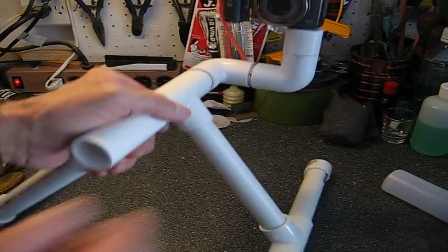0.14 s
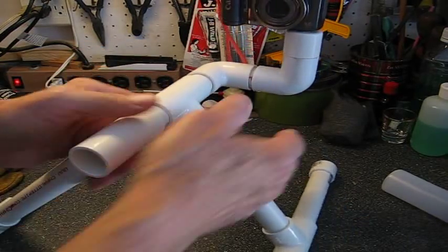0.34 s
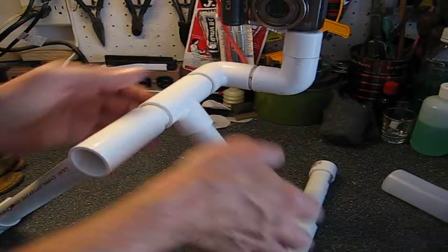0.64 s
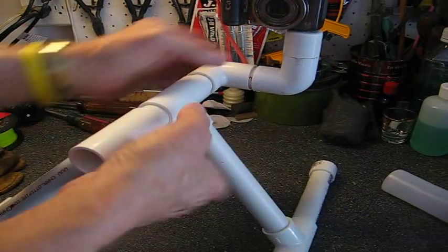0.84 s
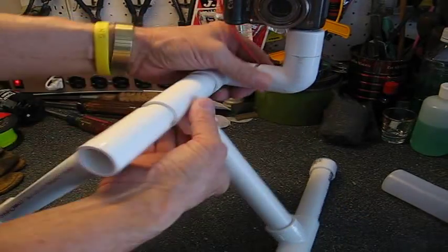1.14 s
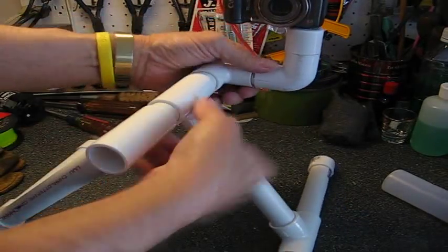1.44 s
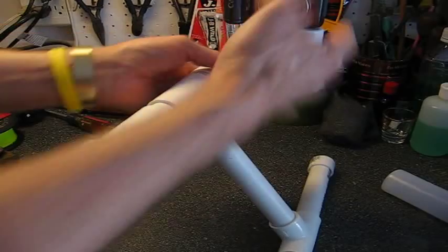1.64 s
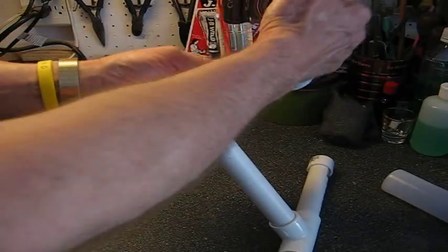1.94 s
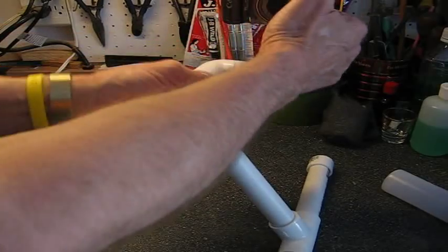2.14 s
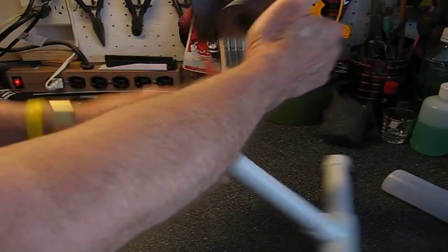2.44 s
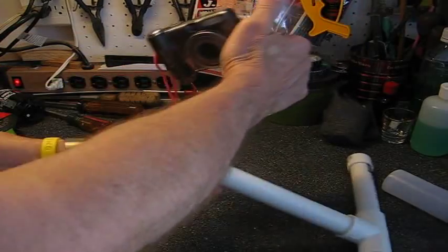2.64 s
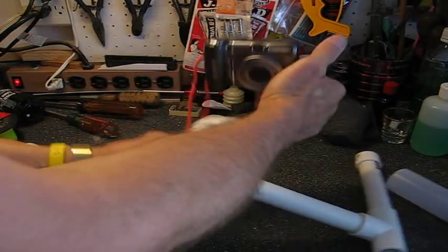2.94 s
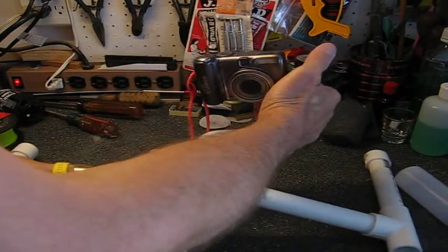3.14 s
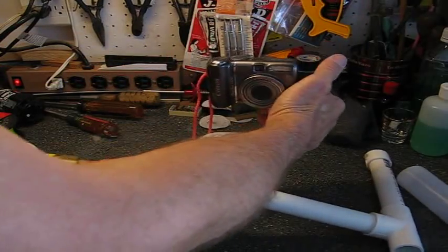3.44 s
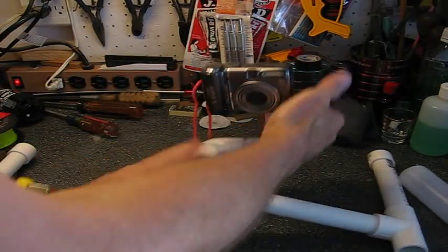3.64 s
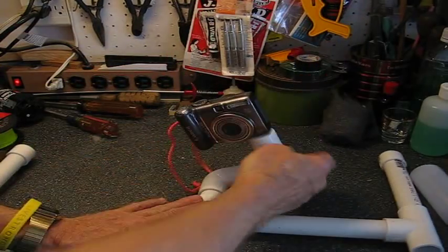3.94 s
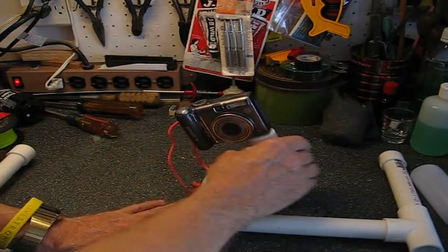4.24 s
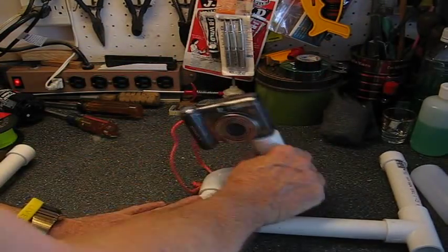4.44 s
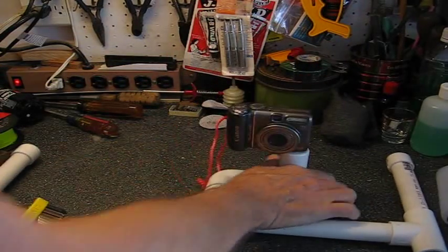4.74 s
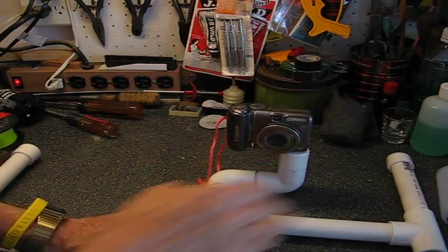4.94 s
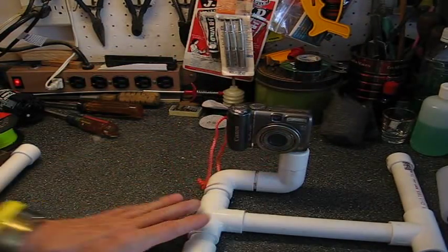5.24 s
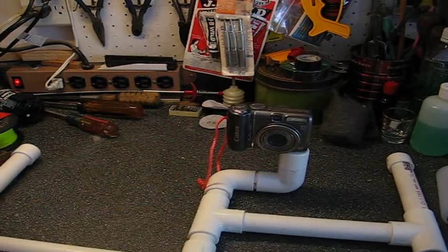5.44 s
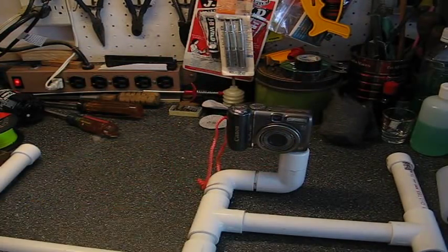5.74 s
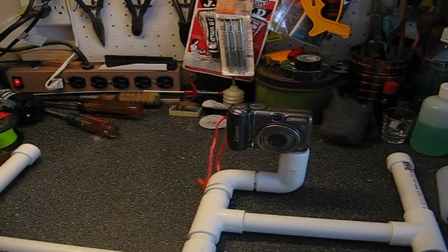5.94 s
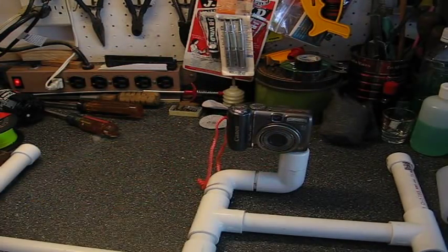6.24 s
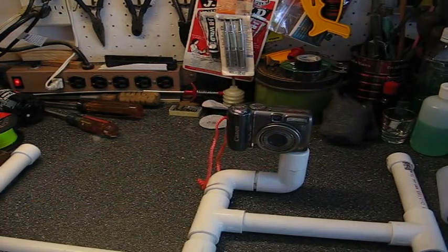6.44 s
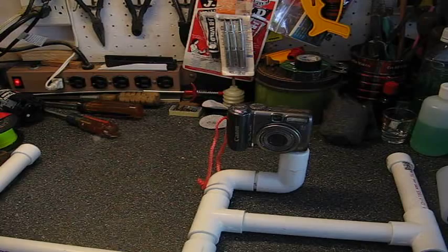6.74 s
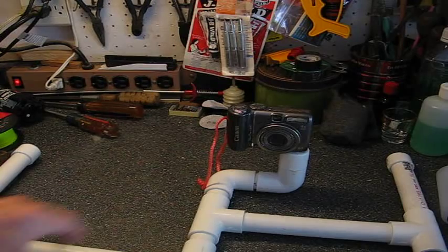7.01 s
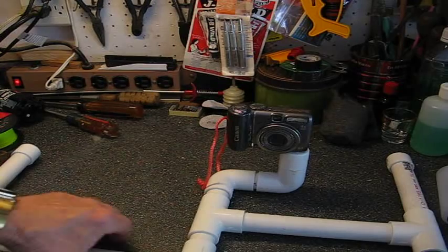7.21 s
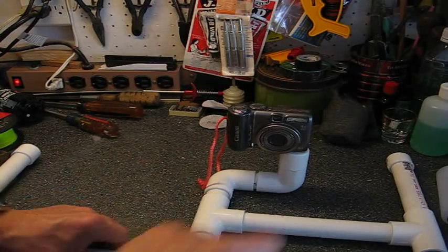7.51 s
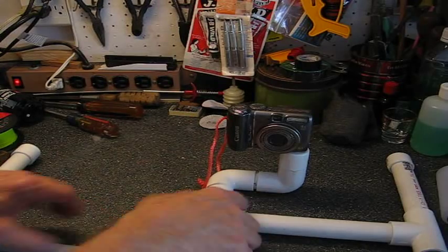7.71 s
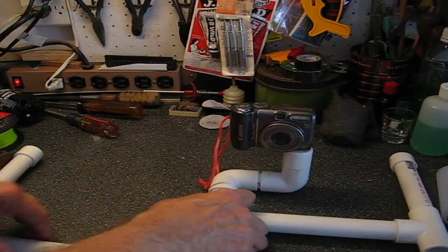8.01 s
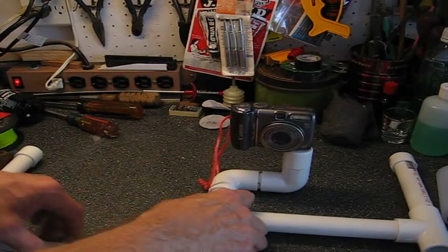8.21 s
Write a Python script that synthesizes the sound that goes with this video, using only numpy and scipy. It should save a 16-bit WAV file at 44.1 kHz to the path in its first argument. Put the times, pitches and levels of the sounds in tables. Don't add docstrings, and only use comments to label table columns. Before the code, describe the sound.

Close, rough small-camera sound of plastic pipes handled on a workbench: bangle ticks, dull hollow knocks, loose joint rattles and short gritty scrapes. The loudest blows are brittle and slightly distorted, with a short room echo. After two heavy drops midway it grows sparse, with a little cluster of clacks, faint hand rubbing and a closing knock over a low, unsteady machine hum.

```python
import sys
import numpy as np
from scipy import signal
from scipy.fft import rfft, irfft
from scipy.io import wavfile

SR = 44100
rng = np.random.default_rng(int(sys.argv[2]) if len(sys.argv) > 2 else 0)


def convert_level_to_amplitude(level_db):
    exponent = np.asarray(level_db, float) / 20
    return 10 ** exponent


def transcribe(u):
    v = np.clip(np.atleast_2d(u).T, -1, 1)
    q = np.round(v * 32767).astype(np.int16)
    wavfile.write(sys.argv[1], SR, q)


N = 369116


def rms_one(x):
    return x / np.sqrt(np.mean(x ** 2) + 1e-20)


def resonance(x, hz, width):
    r = np.exp(-np.pi * width / SR)
    top = np.array([1, 0, -1]) * (1 - r * r) / 2
    return signal.lfilter(top, [1, -2 * r * np.cos(2 * np.pi * hz / SR), r * r], x)


def body(x, modes):
    out = 0
    for k, (hz, width, db) in enumerate(modes):
        out = out + (-1) ** k * convert_level_to_amplitude(db) * resonance(x, hz, width)
    return out


def drift(rate):
    count = int(N * rate / SR) + 2
    return np.interp(np.arange(N) * rate / SR, np.arange(count), rng.standard_normal(2000)[:count])


def grains(per_s, spread_db):
    sizes = convert_level_to_amplitude(spread_db * np.minimum(rng.exponential(1, N), 4)) * rng.choice([-1, 1], N)
    return rms_one(sizes * (rng.random(N) < per_s / SR) + 1e-18)


def add(out, s, sound):
    i = round(s * SR)
    out[i:i + len(sound)] += sound[:N - i]


# (time [s], peak level [dB], pipe note [Hz], time to fade 60 dB [s], hardness [0-1])
KNOCKS = [(.162, -20, 707, 0.13, 0.1), (.197, -13.5, 349, 0.055, 0.33), (.299, -22.5, 710, 0.14, .35),
          (.3555, -5, 830, 0.034, 0.83), (1.176, -21.5, 453, 0.043, 0.6), (1.4105, -13, 352, 0.074, .5),
          (1.817, -14, 494, 0.14, 0.9), (1.944, -10.5, 473, 0.063, 0.44), (2.031, -17.5, 341, 0.086, 0.5),
          (2.322, -13.5, 463, .06, 0.37), (2.568, -2, 1300, 0.01, 0.52), (3.033, -19.5, 458, 0.14, 0.4),
          (3.0885, -7, 910, 0.028, 0.9), (3.318, -26, 680, 0.054, 0.5), (3.815, -24, 486, 0.14, 0.2),
          (3.845, -18, 516, 0.25, 0.99), (3.9345, -4, 657, 0.041, 1), (4.646, -28, 830, 0.067, 0.6),
          (4.6905, -5.5, 1010, 0.05, 0.9), (5.906, -17.5, 724, 0.093, 1), (7.808, -26, 372, 0.05, 0.26),
          (8.04, -24.5, 620, 0.051, 0.8), (8.3555, -14, 664, .031, 0.93)]
# (time [s], peak level [dB], note [Hz], time to fade 60 dB [s])
HUMS = [(0.164, -19.5, 1340, 0.035), (.2, -22.5, 692, 0.16), (.339, -5.5, 180, 0.083),
        (0.3575, -8.5, 1730, 0.041), (0.36, -27, 976, 0.15), (1.82, -14.5, 149, 0.11),
        (2.54, -16, 486, 0.65), (2.588, -3.5, 193, 0.12), (3.139, -16.5, 186, .14),
        (3.856, -13.5, 301, 0.2), (3.955, -14.5, 135, 0.12), (4.699, -5.5, 262.6, .24),
        (7.319, -34.5, 1417, 0.16), (8.349, -4.5, 213, 0.038), (8.35, -9, 139, 0.22)]
# (time [s], peak level [dB], note [Hz], time to fade 60 dB [s])
REBOUNDS = [
    (.378, -12.5, 914, 0.038),
    (3.9387, -2.5, 520, 0.077),
    (3.948, -7.5, 945, .1),
    (3.958, -8, 613, 0.097),
    (4.697, -9, 680, .068),
    (4.722, -10.5, 532, 0.14),
]
# (pitch [Hz], width [Hz], level [dB])
BENCH = [(131.3, 37, -6), (201, 45, 0.5), (276, 61, -2)]
# (pitch [Hz], width [Hz], level [dB])
PIPES = [(302, 30, -4.5), (364.4, 51, 0), (486, 50, 0.5), (680, 73, -2.5), (830, 104, 0), (913, 290, -7.5),
         (570, 30, -14)]
# (pitch [Hz], width [Hz], level [dB])
WALLS = [(1250, 130, 2.5), (1410, 150, 3), (1540, 300, -1.5), (1848, 64, -1.5), (2010, 240, -10.5)]
HUM_HARDNESS, REBOUND_HARDNESS = 0.02, 0.6
SOFT_CUT_HZ, CUT_OCTAVES = 310, 3.14
SOFT_CRACK_DB, CRACK_GAIN_DB, CRACK_T60_S = -42.5, 42.5, .035


def knocks():
    out, t = np.zeros(N), np.arange(SR // 3) / SR
    frame = BENCH + PIPES + WALLS
    blows = KNOCKS + [(*row, HUM_HARDNESS) for row in HUMS]
    blows = blows + [(*row, REBOUND_HARDNESS) for row in REBOUNDS]
    chance = rng.standard_normal((len(blows), len(frame) + 900))
    for (s, db, hz, t60, hardness), c in zip(blows, chance):
        sound = np.zeros(len(t))
        for (mode_hz, width, mode_db), u in zip(frame, c):
            level = np.sign(np.sin(9 * u)) * convert_level_to_amplitude(mode_db - 12.0 + 3.2 * u)
            sound += level * np.sin(2 * np.pi * mode_hz * t) * np.exp(-np.pi * 1.3 * width * t)
        crack_db = SOFT_CRACK_DB + CRACK_GAIN_DB * hardness + 9.5
        sound[:900] += c[-900:] * convert_level_to_amplitude(crack_db - 60 * t[:900] / CRACK_T60_S)
        cut_hz = SOFT_CUT_HZ * 2 ** (CUT_OCTAVES * hardness)
        sound = signal.sosfilt(signal.butter(4, cut_hz, fs=SR, output="sos"), sound)
        air_note = np.sin(2 * np.pi * hz * t) * convert_level_to_amplitude(1.5 - 60 * t / t60) * np.tanh(t * hz / 0.89)
        add(out, s, convert_level_to_amplitude(db) * (sound + air_note))
    return out


# (pitch [Hz], width [Hz], level [dB])
SURFACE = [(1300, 830, -3), (2730, 580, 2.5), (3690, 930, -0.5), (5700, 580, -10.5)]
# (time [s], pipes level [dB], time to die [s], bench level re pipes [dB], walls level re pipes [dB])
RATTLES = [
    (.357, -8, 0.14, -8.5, -7),
    (1.412, -17, 0.042, -0.5, -23),
    (1.816, -14, .15, -1.1, -12),
    (1.946, -24.5, 0.043, -8, -12),
    (2.321, -24.5, 0.055, -4, -24),
    (3.092, -19, 0.2, -16, -10),
    (3.938, -7, 0.29, -14, -4),
    (4.69, -9.5, 0.32, -17, -9.5),
    (8.354, -13.5, .39, -24, -13),
]
RATTLE_GRIT_DB = -14


def rattles():
    t, levels = np.arange(SR // 2) / SR, np.zeros((4, N))
    for s, db, t60, bench_db, walls_db in RATTLES:
        fade_db = 60 * (t / t60) ** 1.41
        for level, part_db in zip(levels, (0, bench_db, walls_db, RATTLE_GRIT_DB)):
            add(level, s, convert_level_to_amplitude(db + part_db - fade_db))
    shaken = grains(4500, spread_db=4.0)
    parts = PIPES, BENCH, WALLS, SURFACE
    return sum(level * rms_one(body(shaken, modes)) for level, modes in zip(levels, parts))


# (time of greatest pressure [s], rise [s], fall [s], pipes level [dB], grit level re pipes [dB])
DRAGS = [(.05, 0.2, 0.14, -32.5, -4.5), (.18, 0.089, 0.056, -32, 1), (.6, 0.23, 0.27, -47, 7),
         (1.32, 0.084, 0.1, -25.5, -7), (2.6, 0.083, .17, -15.5, -7), (2.7, .06, 0.086, -30, -0.5),
         (2.862, 0.052, 0.037, -34.5, -6), (2.96, 0.047, 0.022, -32.5, -1.5),
         (3.08, 0.11, 0.073, -26.5, -3.3), (3.16, 0.057, 0.047, -19.5, -10.5),
         (4.675, 0.13, 0.057, -32, -5.5), (7.89, 0.028, 1, -44.5, 3.5)]
# (time of greatest pressure [s], rise [s], fall [s], pipes level [dB], grit level re pipes [dB])
RUBS = [(.31, .06, 0.09, -27, -9), (2.5, 0.027, 0.17, -24, -5.5), (3.23, 0.012, 0.02, -41, 5.5),
        (3.815, 0.014, 0.021, -22, -7.5), (3.865, 0.052, 0.14, -18.5, -5), (3.98, 0.057, 0.12, -27, 0.5),
        (4.33, .04, .04, -48, -3), (4.56, 0.025, 0.067, -49, 7), (5.58, 0.07, 0.037, -35, -10),
        (5.915, 0.033, 0.069, -30.5, 6.5), (7.15, 0.44, 0.09, -50.5, 9), (7.395, 0.052, 0.099, -42, 7),
        (7.668, 0.055, 0.048, -42, 7)]
DRAG_BENCH_DB, RUB_BENCH_DB = -1.5, -26.5
FINEST_DB, FINEST_GROWTH = -13.5, 0.41
STROKE_FADE_DB, STROKE_ROUNDNESS = 26.5, 1.7


def strokes():
    t, levels = np.arange(N) / SR, np.zeros((4, N))
    for rows, bench_db in ((DRAGS, DRAG_BENCH_DB), (RUBS, RUB_BENCH_DB)):
        for s, rise, fall, db, grit_db in rows:
            near = slice(max(int((s - 2 * rise) * SR), 0), int((s + 2 * fall) * SR))
            away = np.maximum((s - t[near]) / rise, (t[near] - s) / fall)
            pressure = convert_level_to_amplitude(db - STROKE_FADE_DB * away ** STROKE_ROUNDNESS)
            finest_db = grit_db + FINEST_DB + FINEST_GROWTH * (db + 33.5)
            levels[:, near] += pressure * convert_level_to_amplitude(np.array([[0], [grit_db], [bench_db], [finest_db]]))
    return levels


def slides():
    slips = convert_level_to_amplitude(0.76 * drift(40)) * grains(1500, spread_db=2.5)
    fine = convert_level_to_amplitude(3.5 * drift(60)) * (grains(2500, spread_db=4.0) + .5 * slips)
    finest = convert_level_to_amplitude(3.5 * drift(82)) * grains(1800, spread_db=3.5)
    hollow = rms_one(body(slips, PIPES)) + convert_level_to_amplitude(-11) * rms_one(body(slips, WALLS))
    hiss = resonance(resonance(finest, 5000, 1800), 5000, 1800)
    layers = hollow, body(fine, SURFACE), body(slips, BENCH), hiss
    return sum(level * rms_one(layer) for level, layer in zip(strokes(), layers))


# (time [s], peak level [dB], centre pitch [Hz])
CLICKS = [(.017, -25, 3000), (.065, -21, 3500), (.104, -22, 3500), (.316, -17, 4800), (0.3562, -5, 3740),
          (1.4099, 0.5, 4760), (1.822, -15, 3950), (2.6, -16, 4550), (2.699, -34, 3500), (2.991, -20, 4900),
          (3.0889, -7, 1470), (3.1398, -4.5, 4300), (3.406, -12, 4530), (3.544, -17, 4500),
          (3.9345, 5.5, 3630), (3.9385, -1, 2000), (4.318, -30, 4500), (4.553, -24, 4000),
          (4.6905, -5.5, 3020), (5.9249, -9, 3480), (5.953, -15, 4530), (5.977, -18, 4800),
          (7.899, -17, 3100)]
# (time [s], peak level [dB], centre pitch [Hz])
SCUFFS = [(.175, -13.5, 3900), (.3, -16, 5330), (1.8139, -10, 3500), (2.56, -11.5, 4900), (2.655, -9, 4760),
          (2.733, -12, 4500), (2.799, -14.5, 3400), (2.949, -23, 2300), (3.109, -12, 3160),
          (3.168, -11.5, 3780), (3.231, -25, 1800), (3.239, -34, 2900), (3.765, -21, 4000),
          (3.844, -12.5, 3700), (4.71, -16, 4980), (4.835, -20.5, 4500), (5.9068, -9, 3020),
          (7.64, -40, 3000), (8.353, -12, 3080)]
CLICK_T60_S, SCUFF_T60_S = .006, 0.025
FIRST_TOUCH = 4.8


def ticks():
    out, t = np.zeros(N), np.arange(1500) / SR
    snaps = [(*row, CLICK_T60_S) for row in CLICKS] + [(*row, SCUFF_T60_S) for row in SCUFFS]
    chance = rng.standard_normal((len(snaps), len(t)))
    for (s, db, hz, t60), c in zip(snaps, chance):
        fizz = (c - FIRST_TOUCH * (t == 0)) * convert_level_to_amplitude(-60 * t / t60)
        snap = resonance(resonance(fizz, hz, 0.79 * hz), hz, 0.79 * hz)
        add(out, s, convert_level_to_amplitude(db) * snap / np.abs(snap).max())
    return out


# (centre pitch [Hz], time to fade 60 dB [s], level [dB])
ROOM = [(131, 0.41, 6.5), (360, 0.32, -1.5), (870, 0.31, -4), (2340, 0.23, -1.5), (4220, 0.1, -5)]
ROOM_DB = -10.5


def room(x):
    t, tail = np.arange(SR * 6 // 10) / SR, 0
    for hz, t60, db in ROOM:
        band = rms_one(resonance(rng.standard_normal(len(t)), hz, 0.3 * hz))
        tail = tail + band * np.sqrt(hz / 1000) * convert_level_to_amplitude(db - 60 * t / t60)
    tail = tail * np.clip(t / 0.0035, 0, 1)
    return signal.fftconvolve(x, tail / np.sqrt(np.sum(tail ** 2)))[:N]


# (pitch [Hz], level per Hz [dB])
SHOP = [(38, -9.5), (62, -7.5), (150, -17.5), (430, -25), (850, -29), (1200, -33.5), (3300, -36),
        (6500, -47)]
# (time [s], level [dB])
SHOP_LEVEL = [(0.0, -20.5), (0.67, -25), (1.21, -24), (1.4, -23.5), (3.47, -24), (4.34, -25), (5.43, -25.5),
              (5.59, -24.5), (6.97, -25.5), (7.2, -23.5), (8.02, -25), (8.37, -23)]
# (pitch [Hz], width [Hz], level [dB])
MOTOR = [(27.76, 6.5, -27.5), (80.6, 24.8, -29.5)]


def shop():
    hz = np.maximum(np.fft.rfftfreq(N, 1 / SR), 1)
    points = np.array(SHOP)
    colour_db = np.interp(np.log(hz), np.log(points[:, 0]), points[:, 1])
    white = rfft(rng.standard_normal(N)) * convert_level_to_amplitude(colour_db)
    low = hz < 250
    air = irfft(white * low, N) * convert_level_to_amplitude(1.6 * drift(4.5))
    air = air + irfft(white * ~low, N) * convert_level_to_amplitude(0.81 * drift(11))
    hum = 0
    for f, width, level_db in MOTOR:
        wavering = resonance(resonance(rng.standard_normal(N), f, width), f, width)
        hum = hum + convert_level_to_amplitude(level_db) * rms_one(wavering)
    s, db = np.transpose(SHOP_LEVEL)
    loudness = convert_level_to_amplitude(np.interp(np.arange(N) / SR, s, db) + 24.5)
    return loudness * (convert_level_to_amplitude(-27.5) * rms_one(air) + hum)


def scene():
    struck = knocks() + ticks()
    rubbed = slides() + rattles()
    echoes = convert_level_to_amplitude(ROOM_DB) * room(struck + 0.52 * rubbed)
    return (struck + rubbed + echoes + shop())[None]


LIMIT_DB, RELEASE_DB_PER_S, ATTACK_S = -4, 253.5, 0.008


def limiter(x):
    ramp = RELEASE_DB_PER_S * np.arange(N) / SR
    level_db = np.maximum.accumulate(20 * np.log10(np.abs(x) + 1e-9) + ramp) - ramp
    r = np.exp(-1 / (ATTACK_S * SR))
    return x * convert_level_to_amplitude(-signal.lfilter([1 - r], [1, -r], np.maximum(level_db - LIMIT_DB, 0)))


def low_pass(x):
    return signal.sosfilt(signal.butter(12, 17100, fs=SR, output="sos"), x)


DOUBLER = np.array([-1, 0, 9, 16, 9, 0, -1]) / 16
CEILING, OFFSET = 1.12, -.0205
STEP, CUTOFF_HZ = 4, 15900


def record(dry):
    x = CEILING * np.tanh(limiter(dry[0]) / CEILING) + OFFSET
    x = signal.sosfilt(signal.butter(4, 6000, fs=SR, output="sos"), x)[::STEP]
    once = signal.upfirdn(DOUBLER, x, up=2)
    twice = signal.upfirdn(DOUBLER, once, up=2)[9:N + 9]
    top_cut = signal.cheby2(10, 40, CUTOFF_HZ + 300, fs=SR, output="sos")
    twice = signal.sosfiltfilt(top_cut, twice)
    return low_pass(np.clip(twice, -1, 1)[None])


dry = scene()
out = record(dry)
transcribe(out)
```